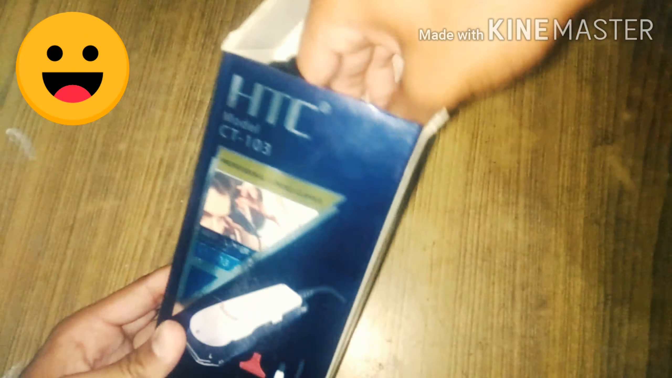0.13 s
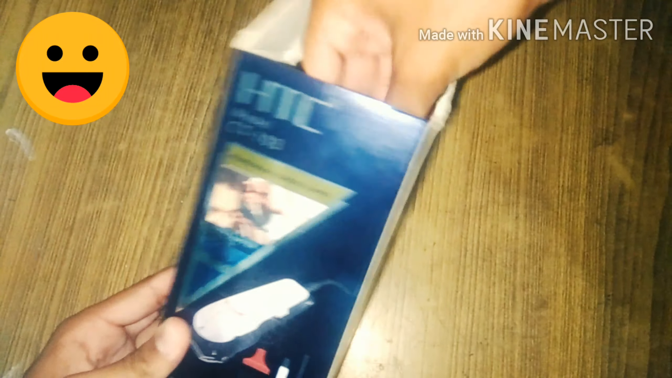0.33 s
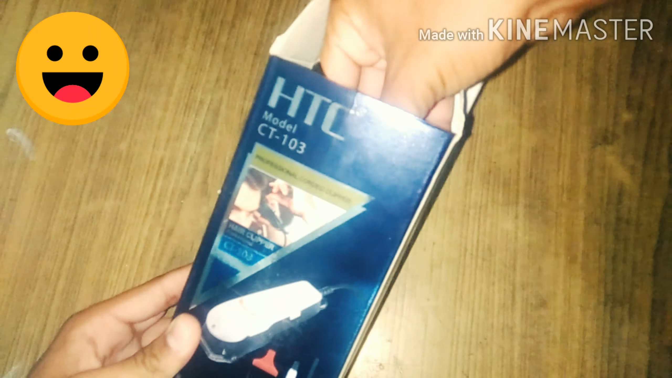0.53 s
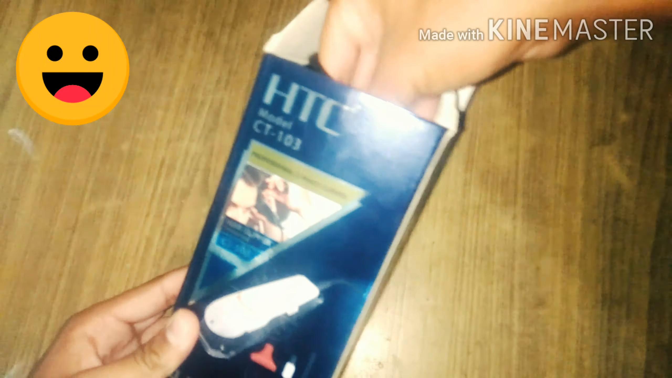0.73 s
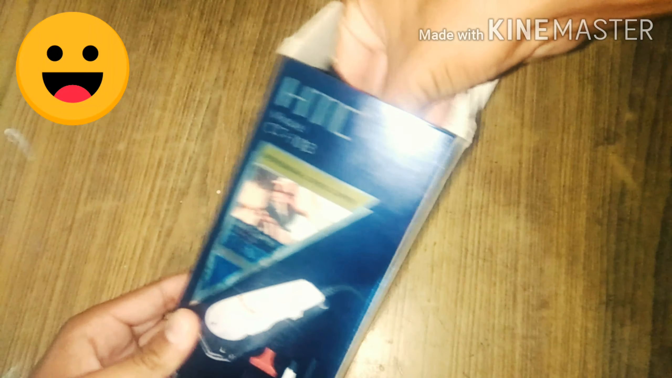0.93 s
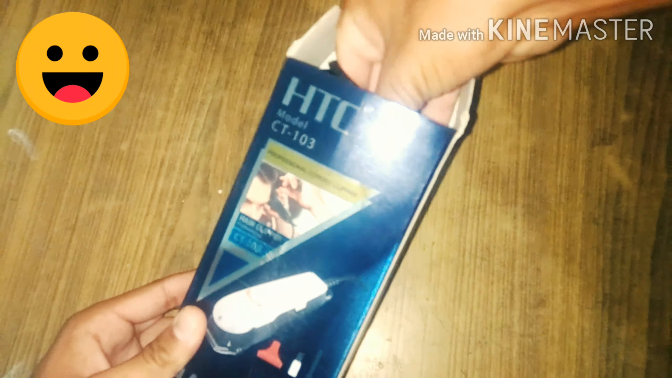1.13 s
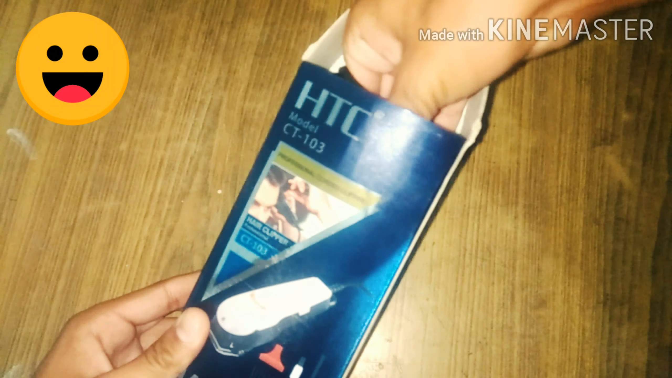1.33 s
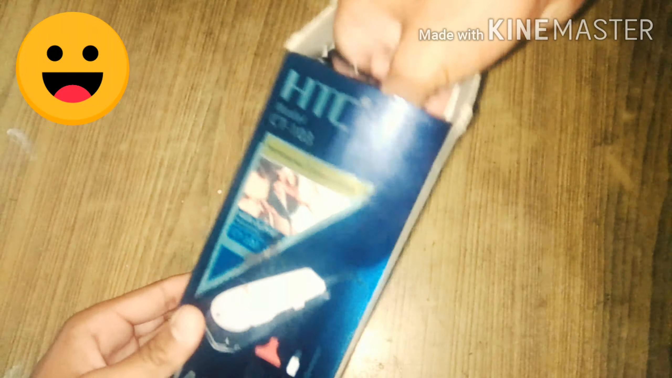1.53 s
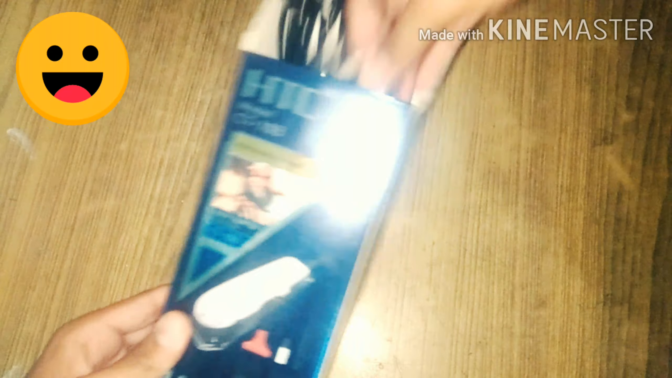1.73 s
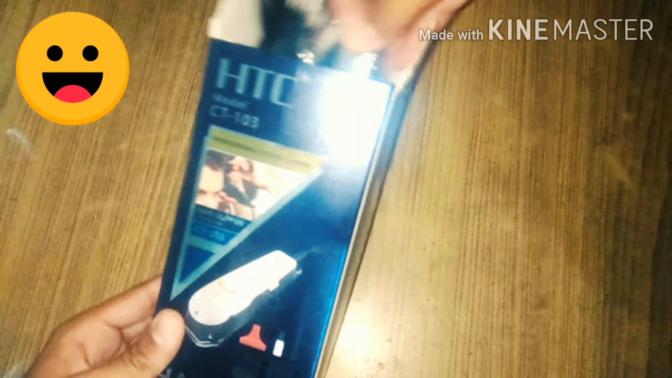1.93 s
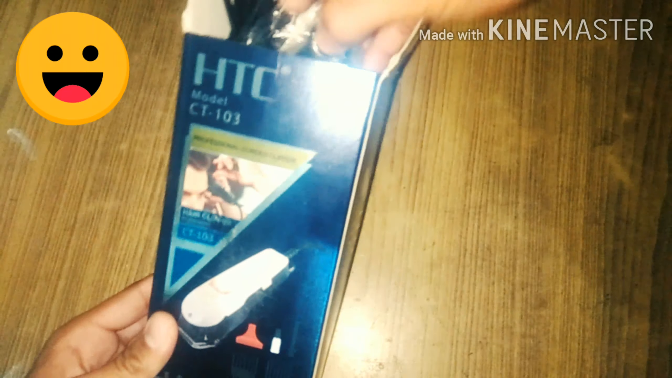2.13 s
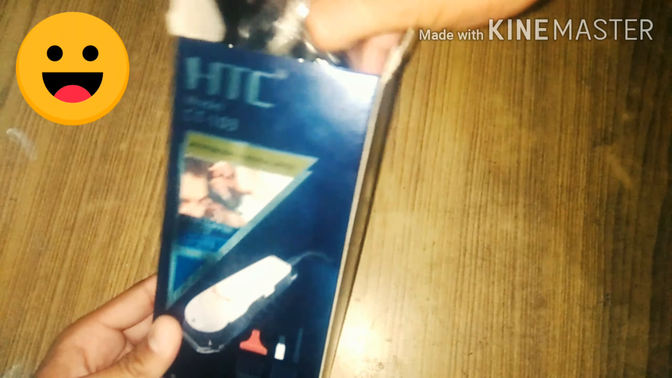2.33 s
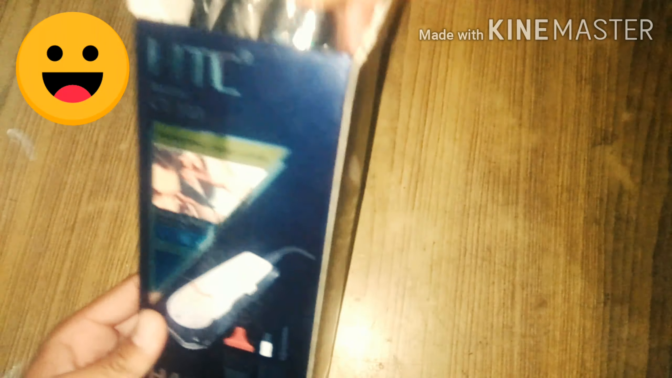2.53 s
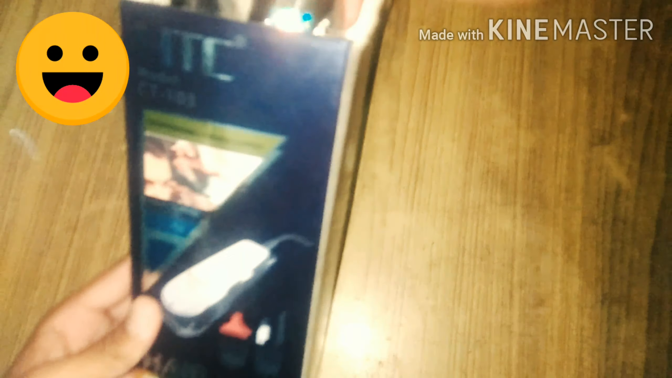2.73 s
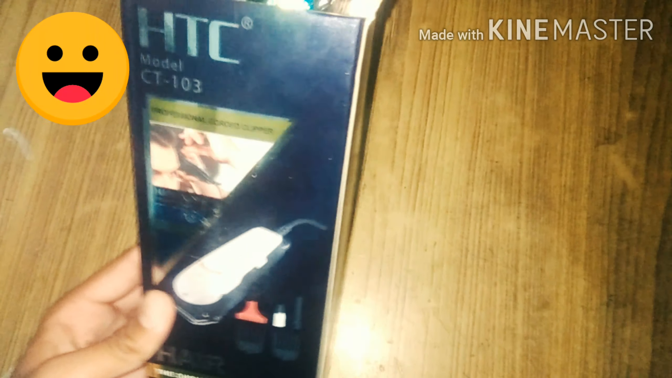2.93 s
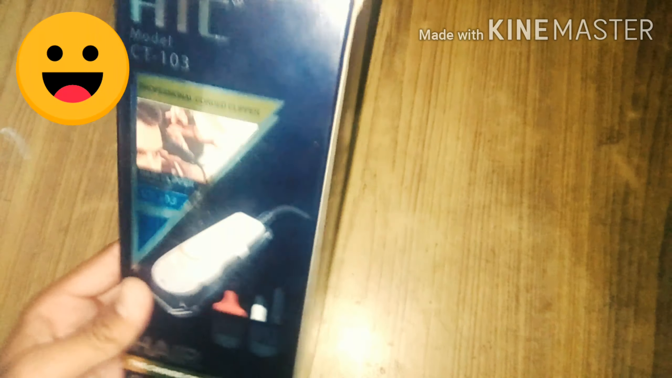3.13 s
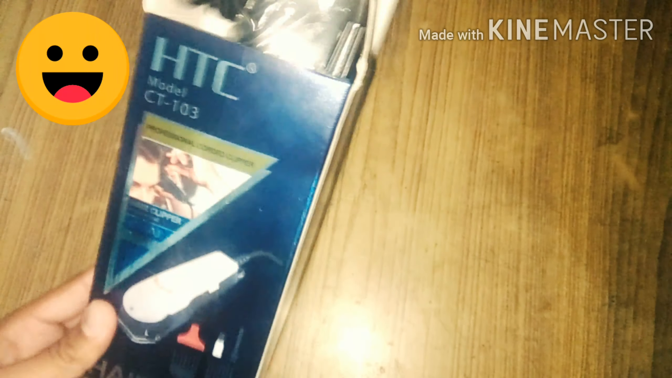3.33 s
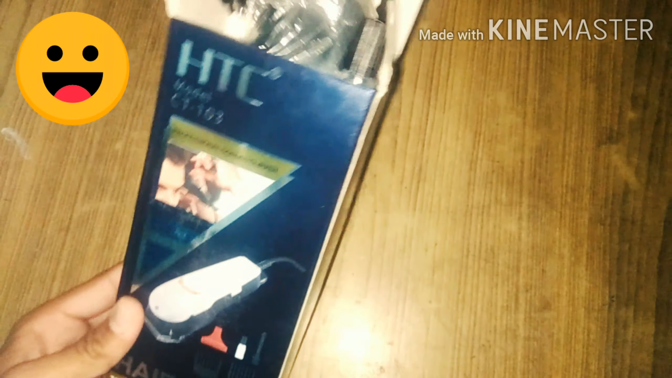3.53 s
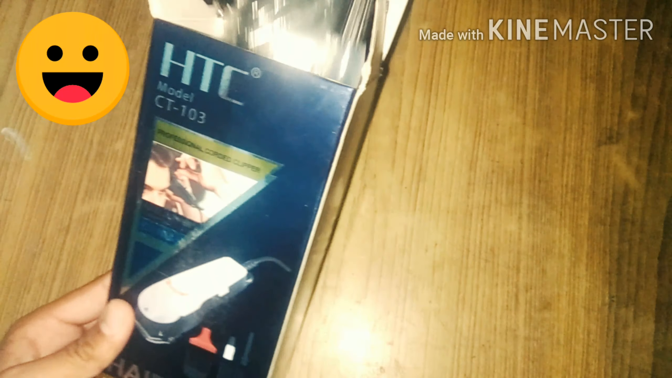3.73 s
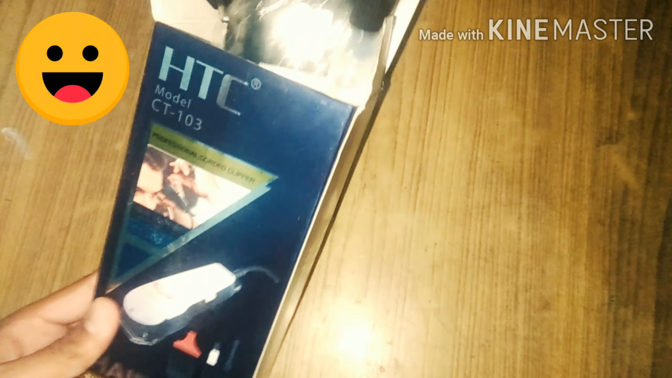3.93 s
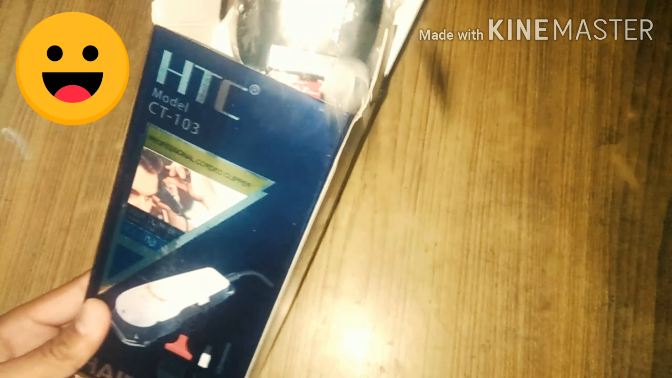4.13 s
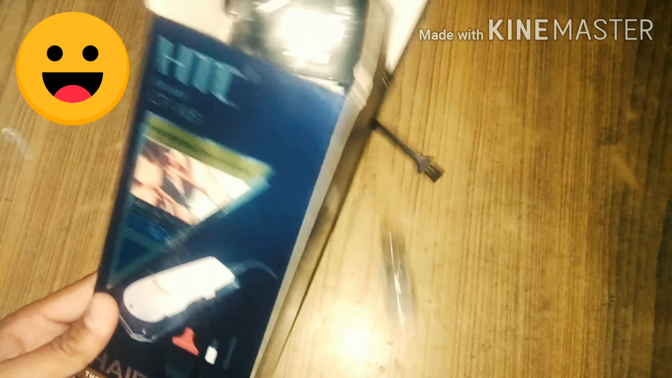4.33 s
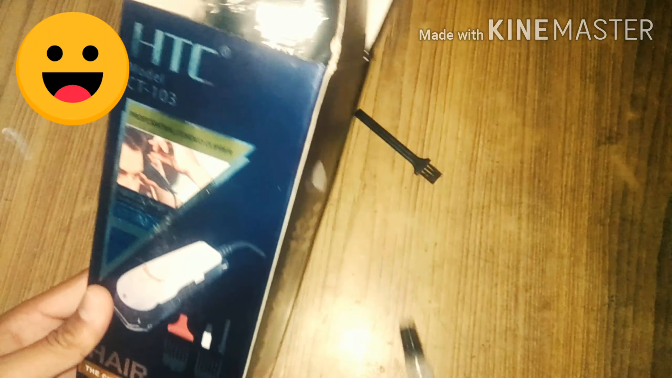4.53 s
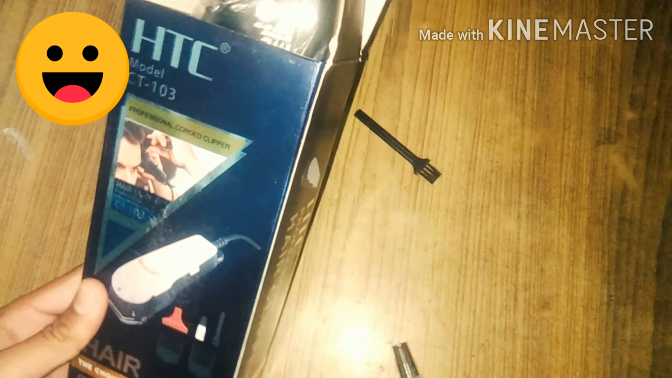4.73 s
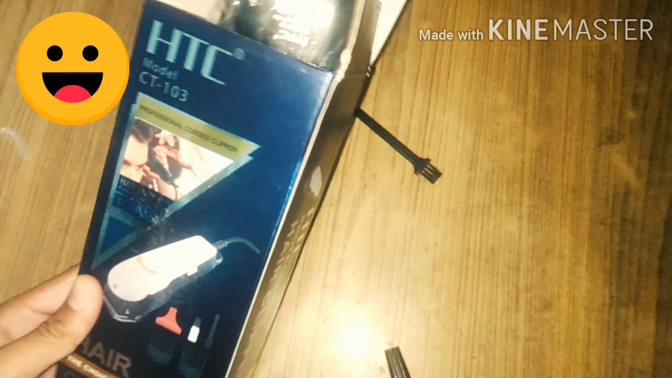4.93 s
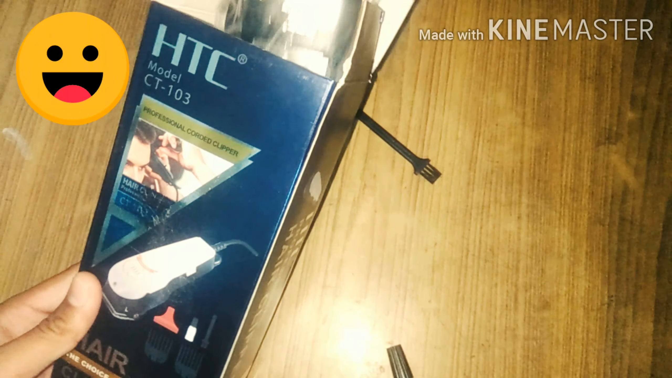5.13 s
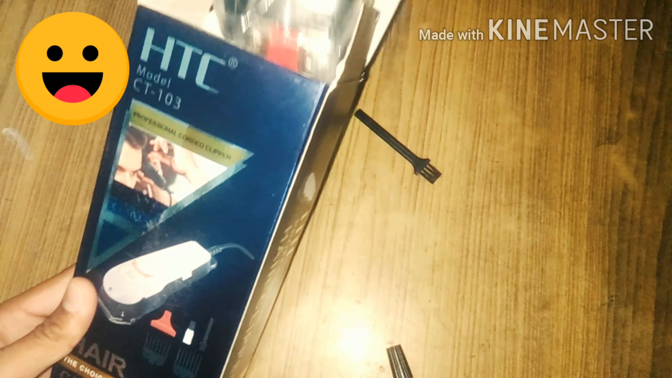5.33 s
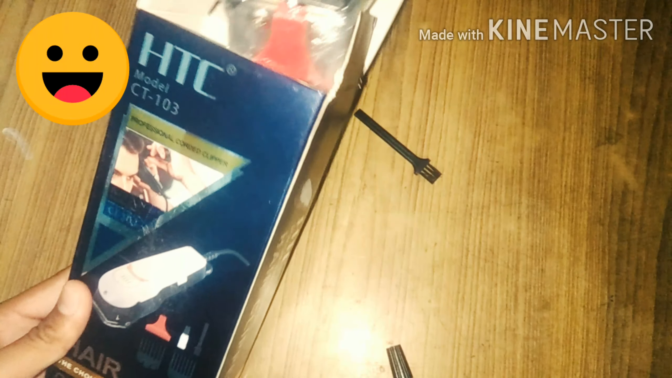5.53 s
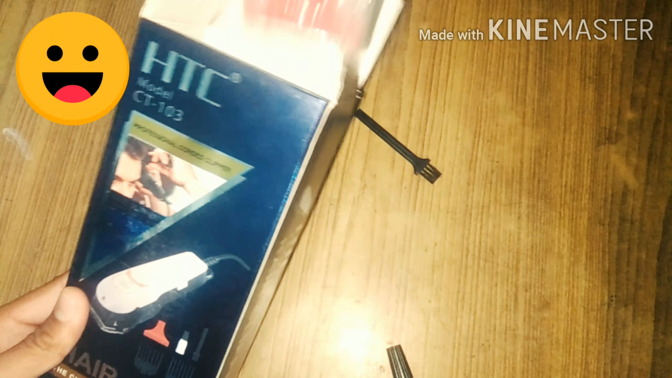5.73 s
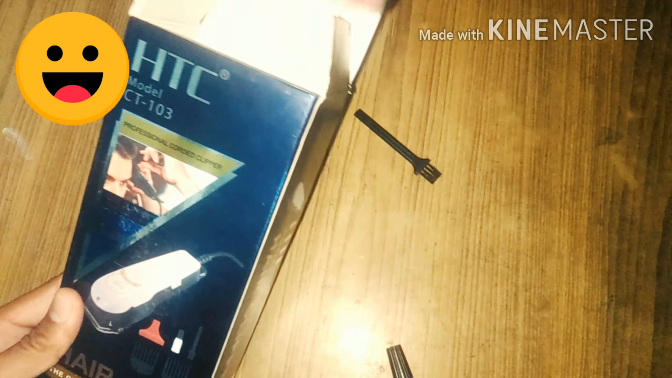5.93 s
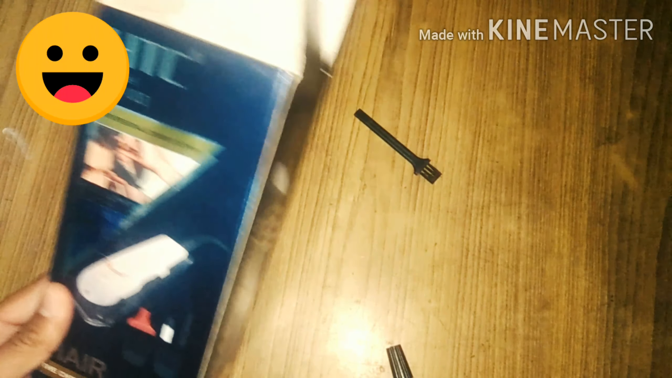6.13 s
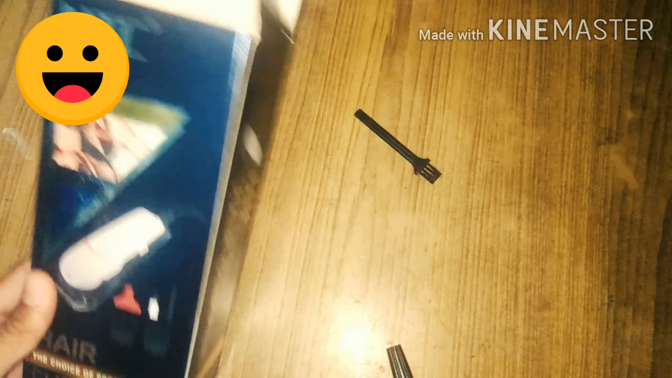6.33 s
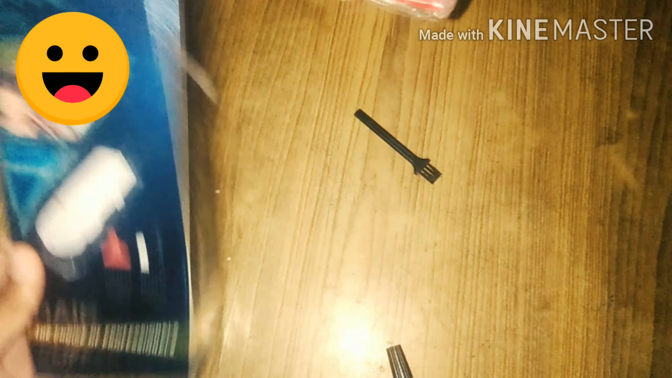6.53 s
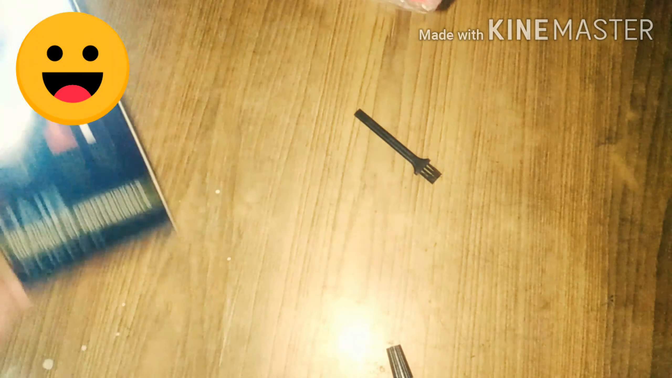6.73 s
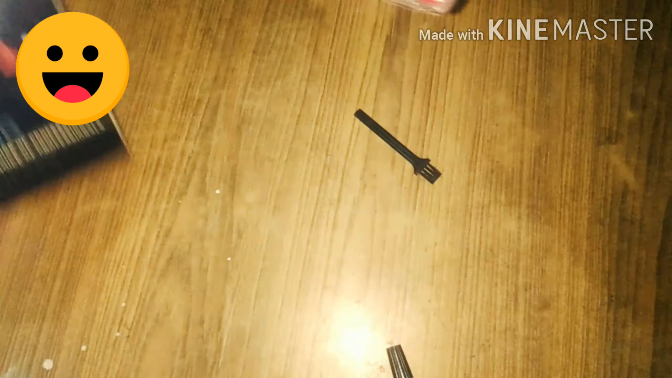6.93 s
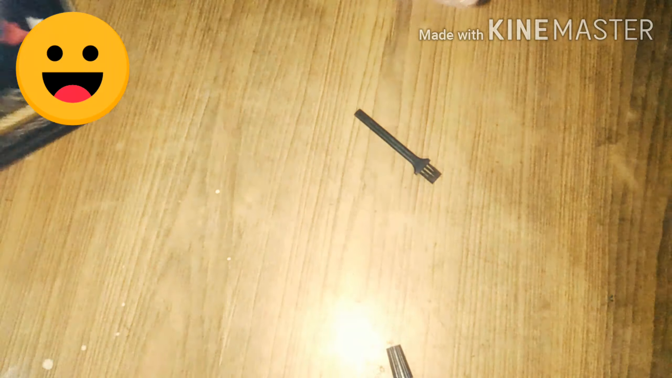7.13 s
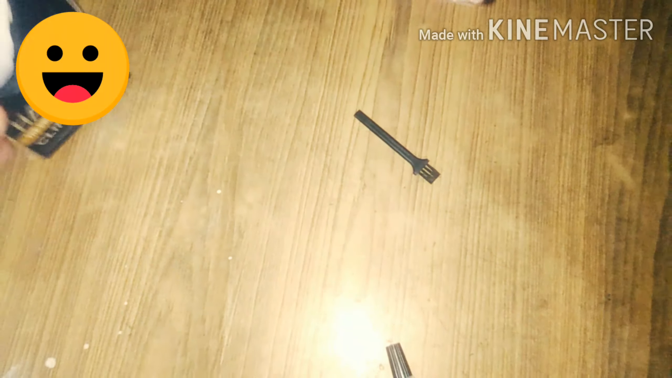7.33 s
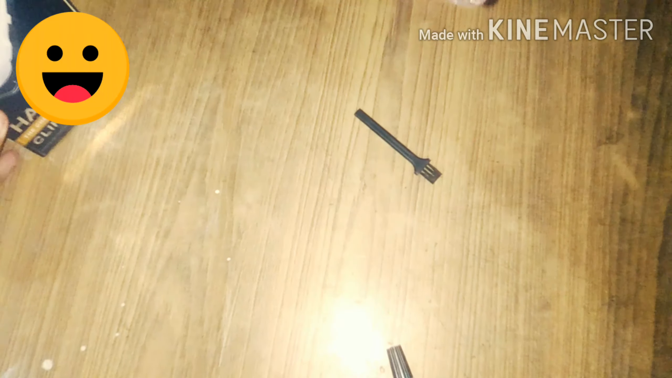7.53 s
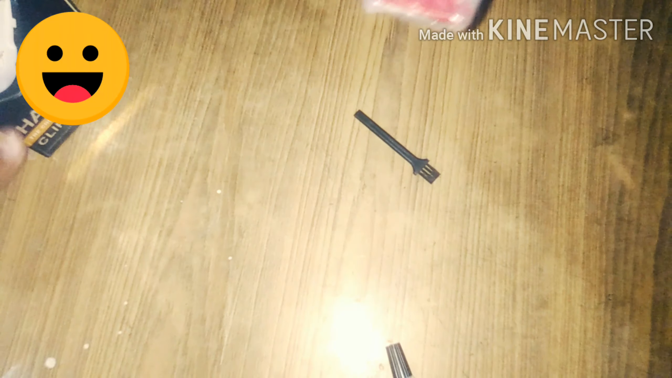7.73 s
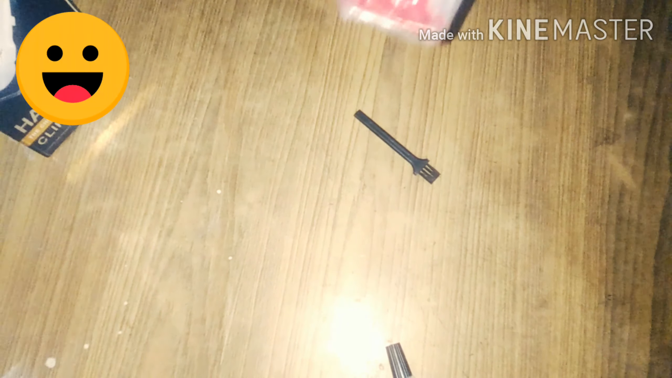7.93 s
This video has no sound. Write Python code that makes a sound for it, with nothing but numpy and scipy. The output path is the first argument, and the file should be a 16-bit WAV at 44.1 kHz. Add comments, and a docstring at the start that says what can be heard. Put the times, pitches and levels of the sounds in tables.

```python
"""Plastic tray out of a cardboard box

Place: a small quiet room, a wooden table; a two-port microphone close to the hands.
Hands pull a thin plastic tray out of a small box, small parts drop out, the empty box is set down.
Blows ring decaying sines of table, board and plastic; strokes shake the same modes with stick-slip noise.
Dragged edges squeak as gliding narrow bands, and creases crackle from all over the tray.
Random echo taps make the room's answer, over a steady hush of shaped noise."""
import sys
import numpy as np
from scipy import signal
from scipy.fft import rfft, irfft, next_fast_len
from scipy.io import wavfile
from scipy.ndimage import uniform_filter1d

SR = 44100
rng = np.random.default_rng(int(sys.argv[2]) if len(sys.argv) > 2 else 0)


def decibels_to_gain(level_db):
    """Convert a level in decibels to a linear amplitude gain (20 dB per decade)."""
    exponent = np.asarray(level_db, float) / 20
    return 10 ** exponent


def inscribe(sig):
    """Save sig as 16-bit PCM at rate SR to the path in sys.argv[1].

    A 1-D sig is mono; a 2-D sig holds one channel per row.
    Samples are clipped to [-1, 1] before scaling.
    """
    pcm = np.round(np.clip(np.atleast_2d(sig).T, -1, 1) * 32767)
    wavfile.write(sys.argv[1], SR, pcm.astype(np.int16))


N = 355871  # length of the scene [samples]


# thuds of box and parts on the table top: (time [s], peak level at the source [dB], centre [Hz],
# for some also a spread of their own [octaves], narrower or broader)
THUDS = [(0.06, -47.5, 172), (0.137, -41.5, 151), (0.496, -44, 198), (0.528, -46.5, 93), (0.974, -53, 287),
         (1.041, -47, 92.5), (1.598, -44.5, 248), (1.74, -45, 410), (1.886, -30, 230), (1.914, -36.5, 153),
         (1.955, -45, 150), (1.994, -49.5, 334), (3.203, -40.5, 304), (3.232, -38, 400), (3.268, -37, 400),
         (3.284, -34, 220), (3.312, -36, 240), (3.349, -39, 193), (3.456, -39.5, 239), (3.58, -46, 191, .4),
         (3.753, -45, 274), (3.997, -45.5, 151), (4.092, -33, 182), (4.234, -30, 160),
         (4.235, -30, 380, .35), (4.287, -35, 260), (4.373, -35, 400), (4.4475, -24, 360, .35),
         (4.4465, -23, 190, .3), (4.48, -29, 195, .2), (4.52, -38, 200), (4.572, -31, 325, .06),
         (4.575, -35, 200, .2), (4.668, -35, 325, .06), (4.667, -41, 200), (4.73, -45, 200),
         (4.765, -46, 330), (5.385, -43.5, 211), (5.582, -37, 208), (5.742, -32, 206), (5.777, -32, 207),
         (6.732, -50, 190), (7.232, -26, 156.5), (7.43, -28, 152), (7.455, -34.5, 151),
         (7.478, -33, 151, .1), (7.671, -48.5, 141), ]
# modes of the table top: (frequency [Hz], relative level [dB], t60 [s])
TABLE_MODES = [(82, -17, 0.12), (96, -4, 0.18), (122.1, -7, 0.18), (151, 0, .15), (171.2, -4.5, 0.059),
               (195, 0.5, 0.17), (222, -2, 0.1), (249.4, 5, 0.084), (280.8, -3, 0.08), (325, -5, 0.17),
               (365, -8, 0.07), (410, -4.5, 0.1)]


def table_thuds():
    """Soft, long contacts ring the slow modes of the table top."""
    return struck(THUDS, TABLE_MODES, contact_s=0.0028, octaves=0.25, grip_db=3.5)


# knocks on the board: (time [s], peak level at the source [dB], centre [Hz],
# for some also a spread of their own [octaves], narrower or broader)
KNOCKS = [(0.064, -41, 1270), (0.124, -39, 1100), (0.1412, -24, 900, .35), (0.495, -36.5, 740),
          (0.496, -33, 1070), (0.635, -34, 1250, .2), (0.981, -37, 600), (1.176, -40, 1110),
          (1.194, -45, 1200, .3), (1.338, -28.5, 1040, .35), (1.392, -44, 810), (1.427, -46, 1200),
          (1.448, -40, 964), (1.606, -28.5, 657), (1.656, -42, 1180), (1.696, -30.5, 1010),
          (1.712, -35.5, 950), (1.738, -33, 1180), (1.744, -28, 1200), (1.795, -41, 1280),
          (1.822, -17.5, 1040), (1.887, -29, 1500, .3), (1.89, -29, 520), (1.899, -31, 1100),
          (1.916, -34, 1200), (1.973, -30, 1270), (1.987, -35, 1250), (2.108, -32.5, 800),
          (2.185, -42, 1130), (2.205, -47.5, 467), (2.306, -44.5, 1140), (2.377, -42, 1300),
          (2.534, -33, 620), (2.943, -41, 520, .2), (2.878, -46.5, 544), (2.912, -38, 1050),
          (3.145, -39, 700), (3.189, -32.5, 1470), (3.21, -31.5, 1370), (3.312, -23, 1000),
          (3.339, -29, 634), (3.454, -37, 1300), (3.513, -32.5, 1240), (3.534, -36, 500),
          (3.761, -35.5, 1460), (3.812, -40.5, 525), (3.835, -37, 1270), (3.904, -33.5, 1220),
          (3.998, -39, 583), (4.089, -21, 826), (4.236, -36, 480, .2), (4.288, -35.5, 540),
          (4.376, -34, 452), (4.386, -37.5, 479), (4.431, -34.5, 1116), (4.447, -11, 620, .5),
          (4.485, -21.5, 930), (4.55, -36, 801), (4.57, -32.5, 589.4), (4.615, -35.5, 474),
          (4.669, -40, 1400, .15), (4.669, -40, 650), (4.71, -40, 600), (4.911, -46, 1500, .15),
          (4.935, -33.5, 900, .4), (5.297, -32, 1090), (5.388, -39.5, 614), (5.474, -47, 1400),
          (5.581, -24.5, 1040), (5.7395, -17, 990, .3), (5.7755, -17, 1000, .25), (6.658, -52, 1790, .1),
          (6.997, -55, 1780, .1), (7.175, -58, 700, .2), (7.232, -34, 729, .2), (7.233, -33, 1350, .2),
          (7.306, -32, 700, .3), (7.422, -41, 720, .3), (7.459, -35.5, 560), (7.675, -44.5, 510)]
# modes of the board: (frequency [Hz], relative level [dB], t60 [s])
BOARD_MODES = [(454, -5, 0.044), (513.2, 1.5, 0.047), (581.8, -1, 0.044), (650, -3, .04), (705, -1, .05),
               (737, -7.5, 0.083), (781, -9, 0.076), (854.4, -2, 0.04), (966, 7, 0.02), (1009, -0.5, 0.05),
               (1110, 6.5, 0.025), (1173, 5.5, .035), (1270, 5.5, 0.042), (1357, 5, 0.037),
               (1469, 9, 0.019), (1570, -4, 0.027), (1687, -5, 0.025), (1780, -6, .025)]


def board_knocks():
    """Shorter contacts ring the faster modes of the cardboard."""
    return struck(KNOCKS, BOARD_MODES, contact_s=0.00075, octaves=0.45, grip_db=5)


# single snaps of the plastic tray: (time [s], peak level at the source [dB], centre [Hz],
# for some also a spread of their own [octaves], narrower or broader)
SNAPS = [(0.0641, -42.5, 2850), (0.1445, -33, 2120), (0.326, -46, 3300), (0.351, -48, 4300),
         (0.3861, -41, 3500), (0.412, -45, 3100), (0.499, -42, 2290), (0.5, -49, 5000), (0.531, -50, 5200),
         (0.5614, -48, 5160), (0.6519, -46.5, 3520), (0.807, -35.5, 3480), (0.831, -39, 3260),
         (0.864, -38.5, 3700), (0.962, -47.5, 5130), (0.965, -39, 3470), (1.177, -52, 3300),
         (1.194, -54, 4500), (1.234, -52, 4500), (1.339, -43, 2420), (1.339, -50, 5300),
         (1.3924, -44, 2460), (1.427, -47, 3000), (1.4488, -38.5, 2300), (1.595, -42.5, 2400),
         (1.657, -40, 2800), (1.664, -46, 5000), (1.833, -40, 3200), (1.855, -41, 3200), (1.863, -40, 3400),
         (1.887, -40, 3000), (1.913, -45, 3110), (1.926, -50, 6000), (1.987, -44, 3200),
         (1.9733, -37.5, 3100), (2.0538, -36.5, 2400), (2.154, -46.5, 3230), (2.1665, -42.5, 3600),
         (2.1847, -38.5, 3800), (2.2083, -38, 2200), (2.2095, -38, 5400), (2.398, -50, 5300),
         (2.813, -47, 3200), (3.106, -51, 4800), (2.267, -47, 2860), (2.308, -43, 2780),
         (2.4675, -44.5, 2360), (2.9133, -36, 3200), (2.57, -48, 2400), (3.1884, -41, 2600),
         (3.2051, -33, 2200), (3.3139, -26, 2160), (3.314, -34, 3300), (3.339, -30, 2250),
         (3.496, -43, 5000), (3.611, -52, 5530), (3.701, -54, 5600), (3.94, -48, 5400), (4.021, -45, 4200),
         (3.868, -49, 5500), (3.6663, -45.5, 2460), (3.7579, -43.5, 3470), (3.996, -39, 3200),
         (4.0438, -41, 3260), (4.0696, -38, 3400), (4.089, -22.5, 1970), (4.158, -46, 5360),
         (4.1978, -49, 5380), (4.2153, -43, 5350), (4.2336, -34.5, 4530), (4.2956, -39.5, 3600),
         (4.348, -46.5, 4134), (4.376, -25, 5780), (4.377, -27, 3200), (4.388, -28, 4500),
         (4.4333, -32, 2320), (4.448, -28, 2600), (4.484, -28, 5800), (4.4855, -26, 3767),
         (4.5492, -39, 3680), (4.6809, -39, 3794), (4.7038, -43.5, 2650), (4.7741, -42, 3040),
         (4.7745, -40, 5200), (4.803, -47, 6000), (4.837, -45, 5600), (4.913, -49.5, 2000),
         (4.9362, -48, 1990), (4.992, -60, 3980), (5.2982, -38, 2070), (5.3597, -50, 3200),
         (5.3857, -42.5, 3450), (5.4182, -44.5, 3540), (5.538, -48.5, 2620), (5.5825, -28.5, 2295),
         (5.7282, -39.5, 3126), (5.7403, -13, 2350, .25), (5.7412, -24, 3300, .2), (5.757, -33, 3000),
         (5.7755, -15, 2350, .25), (5.7765, -23, 3300, .2), (5.797, -29.5, 2500), (5.9284, -53.5, 3100),
         (6.662, -63, 4540), (6.999, -61.5, 3000), (7.069, -60.5, 5600), (7.234, -38, 2060),
         (7.233, -43, 5000), (7.3068, -41, 3100), (7.4, -54, 4000), (7.421, -47, 3580), (7.439, -48, 4500),
         (7.461, -46, 2600), (7.5157, -49, 2800), (7.549, -52, 2570), (7.575, -56, 2400),
         (7.676, -47, 1900), (7.677, -47, 3200), (7.675, -50, 5600)]
# modes of the plastic: (frequency [Hz], relative level [dB], t60 [s])
PLASTIC_MODES = [(2000, -5, 0.012), (2160, 1.5, 0.0064), (2300, -6.5, 0.014), (2443, -7, 0.015),
                 (2640, -11, 0.019), (2885, -1.5, 0.0092), (3246, 0.5, 0.0078), (3650, -8.5, 0.012),
                 (4230, -6.5, 0.01), (4430, -8, 0.0048), (4830, -6, 0.008), (5380, -5, 0.007),
                 (5900, -6, 0.009), (6350, -3.5, 0.0041), (8630, -1.5, 0.0022), (8840, -8, 0.0051)]


def tray_snaps():
    """Dents that flip in the thin tray ring its high, short modes."""
    return struck(SNAPS, PLASTIC_MODES, contact_s=0.00029, octaves=0.42, grip_db=2)


def struck(events, modes, contact_s, octaves, grip_db):
    """The ring swells in over the contact; hands and table damp it after its first peak by up to grip_db."""
    out = np.zeros(N)
    t = np.arange(0, np.max(modes, 0)[2], 1 / SR)
    swell = 1 - np.exp(-(t / contact_s) ** 2)
    damping = decibels_to_gain(-grip_db * (1 - np.exp(-t / (3.2 * contact_s))))
    ring = rings(modes, len(t)) * swell * damping
    lucks = rng.standard_normal((len(events), len(modes)))
    for (start, db, centre_hz, *own), luck in zip(events, lucks):
        spread_octaves = own[0] if own else octaves
        add(out, start + .0008, decibels_to_gain(db) * blow(modes, ring, centre_hz, spread_octaves, luck))
    return out


def blow(modes, ring, centre_hz, octaves, luck):
    """The place of a blow favours the modes near centre_hz; most start in step, which makes the click; peak 1."""
    hz = np.transpose(modes)[0]
    distance = np.log2(hz / centre_hz) / octaves
    weight = np.exp(-.5 * distance ** 2) + .06
    sound = (weight * (1 + .25 * luck)) @ ring
    return sound / abs(sound).max()


def rings(modes, length):
    """Each mode is one sine that dies away by 60 dB in its t60."""
    hz, db, t60 = np.transpose(modes)[:, :, None]
    t = np.arange(length) / SR
    return decibels_to_gain(db - 60 * t / t60) * np.sin(2 * np.pi * hz * t)


def rubbing():
    """Tray and hands slide on the board; the free panel adds a resonance that shifts with the tray."""
    panel_hz = np.transpose(STROKES)[3]
    scrape = stroking(0)
    # pitch of the panel at every sample, weighted by the strokes that sound
    moving_hz = scrape / stroking(-20 * np.log10(panel_hz))

    # a box pressed on the table has a lower panel and rumbles more: 7 dB per octave below 700 Hz
    rumble = stroking(-4 - 7 * np.log2(panel_hz / 700))
    # a light slide hardly moves the slowest table modes: 24 dB per octave less below 150 Hz
    light = [(hz, db - 24 * max(np.log2(150 / hz), 0), t60) for hz, db, t60 in TABLE_MODES]

    # board modes above stiff_hz grow as the free panel gets smaller and higher
    stiff_hz, stiff_db_per_octave = 900, 6.5
    low = excite([m for m in BOARD_MODES if m[0] <= stiff_hz], 500, 5.4, 1.0, count=3)
    high = excite([m for m in BOARD_MODES if m[0] > stiff_hz], 500, 5.4, 1.0, count=3)
    stiffness = decibels_to_gain(stiff_db_per_octave * np.log2(moving_hz / stiff_hz))
    panel = resonate(slips(900, 4.0, .6), moving_hz, 280)
    board = low + stiffness * high + 0.44 * panel
    return scrape * evened(board) + rumble * excite(light, 200, 4.7, 0.25, count=3)


# strokes of hands and tray along the board: (start [s], length [s], scrape level at the source [dB],
# free panel resonance [Hz], tray crinkle relative to the scrape [dB])
STROKES = [(.0, 2, -72, 900, -1), (0.093, 0.16, -62, 940.4, -21), (0.321, 0.094, -61, 1020, -3.5),
           (0.497, .17, -66.5, 1104, -3), (0.754, 0.077, -62, 1037, -1.5), (0.958, 0.078, -59, 700, -12),
           (1.138, 0.36, -70, 996, -5), (1.566, 0.071, -58.5, 740, -5), (1.659, 0.07, -49, 1028, -4),
           (1.745, 0.1, -42, 1163, -7), (1.897, 0.04, -50.5, 1006, -9.5), (2.003, 0.093, -68, 1013, 9),
           (2.137, 0.35, -66.5, 1044, -3), (2.506, 0.15, -59.5, 540, -8), (2.62, 0.09, -63, 758, -5),
           (2.8, .05, -65, 600, -4), (2.898, 0.066, -60, 584.6, 0), (3.006, 0.19, -71, 650, -1),
           (3.205, 0.14, -46, 800, -1.5), (3.426, 0.086, -50, 800, -7.5), (3.568, 0.2, -64, 900, -7.5),
           (3.744, 0.16, -52.5, 1150, -6.5), (3.936, 0.076, -52.5, 750, -7),
           (4.056, 0.053, -52.5, 739, -16), (4.209, 0.12, -55.5, 502, -13), (4.398, .115, -45, 700, -2),
           (4.52, 0.062, -45.5, 537, -18), (4.6, 0.18, -56.5, 560, -21), (4.922, 0.081, -72.5, 720, -2.5),
           (5.04, 0.37, -77, 700, -6), (5.236, 0.32, -66, 900, -5), (5.576, 0.24, -64.5, 952, -5.5),
           (5.752, 0.19, -68.5, 935, -8), (6.022, 0.52, -94.5, 557, -18), (6.566, .15, -86, 560, -11.5),
           (6.73, 0.1, -74.5, 650, -13), (6.88, .1, -77.5, 560, -18.5), (7.001, .2, -73.5, 640, -14),
           (7.238, .14, -60, 700, -11), (7.417, 0.037, -50.5, 652, -9), (7.5, 0.2, -62, 600, -17),
           (7.751, 0.28, -74.5, 950, -7.5)]


def stroking(extra_db):
    """Strokes set in fast and die away more slowly; each is shifted by its own extra_db."""
    start, length, db = np.transpose(STROKES)[:3]
    return summed(envelopes(start, length, db + extra_db, rise_db_per_s=701.5, fall_db_per_s=255.5))


def envelopes(start, length, db, rise_db_per_s, fall_db_per_s):
    """Gain of each event every 64 samples: rise before the start, hold, fall, all straight in dB."""
    t = np.arange(0, N + 64, 64) / SR - start[:, None]
    rise = rise_db_per_s * np.minimum(t, 0)
    fall = fall_db_per_s * np.maximum(t - length[:, None], 0)
    return decibels_to_gain(db[:, None] + rise - fall)


def summed(gains):
    """Adds events by power and reads the sum at every sample."""
    return np.interp(np.arange(N) / 64, np.arange(gains.shape[1]), np.linalg.norm(gains, axis=0))


def slips(per_s, spread_db, smooth):
    """Stick-slip force: clicks of uneven size over a share of smooth friction noise."""
    at, big, sign = rng.random((int(per_s * N / SR), 3)).T
    size = decibels_to_gain(spread_db * np.minimum(-np.log(big), 3.5))
    clicks = np.zeros(N)
    clicks[(at * N).astype(int)] = size * np.sign(sign - .5)
    return evened(clicks) + smooth * rng.standard_normal(N)


def excite(modes, per_s, spread_db, smooth, count):
    """Several contact points, each shaking the modes with its own signs."""
    signs = rng.choice([-1., 1.], (count, len(modes)))
    total = np.zeros(N)
    for response in signs @ rings(modes, SR // 5):
        total += signal.oaconvolve(slips(per_s / count, spread_db, smooth), response)[:N]
    return evened(total)


def resonate(x, hz, width_hz):
    """A moving resonance: shifts the curve hz down to zero, smooths twice, and shifts back."""
    turn = np.exp(2j * np.pi * np.cumsum(hz) / SR)
    r = np.exp(-np.pi * width_hz / SR)
    smoothed = signal.lfilter([1], [1, -2 * r, r * r], x / turn)
    return evened((turn * smoothed).real)


# bright crinkles, when fingers crush small creases of the tray: (start [s], length [s], level [dB])
CRINKLES = [(0.36, 0.05, -64), (0.78, 0.05, -60), (0.947, 0.018, -57.5), (2.128, 0.16, -68),
            (3.415, 0.09, -64), (3.99, 0.06, -65), (4.21, 0.09, -60.5), (4.379, 0.02, -46),
            (4.67, 0.22, -72.5), (5.345, 0.11, -73), (5.704, .03, -66), (7.42, .02, -67), (1.72, .14, -63),
            (3.2, .08, -62)]


def rustle():
    """Wide creases shake mostly the low modes of the tray, small ones the high; both come in clumps."""
    _, _, db, _, tray_db = np.transpose(STROKES)
    # small creases grow by only a share of the crinkle above a quiet level
    fine_share, quiet_db = 0.63, -76
    fine_db = -6 - (1 - fine_share) * (db + tray_db - quiet_db)
    # high snaps leave a brighter crackle: 35 dB per octave about 3900 Hz, up to 4 dB
    snap_hz = np.array([row[2] for row in SNAPS])
    bright_db = np.minimum(35 * np.log2(snap_hz / 3900), 4)

    coarse = np.hypot(stroking(tray_db), shiver(0))
    fine = np.hypot(stroking(tray_db + fine_db), shiver(bright_db))
    crushed = envelopes(*np.transpose(CRINKLES), rise_db_per_s=2498, fall_db_per_s=255.5)
    fine = np.hypot(fine, summed(crushed))

    clumps = evened(uniform_filter1d(rng.standard_normal(N), size=500))
    wide = [(hz, level - 14 * max(np.log2(hz / 3300), 0), t60) for hz, level, t60 in PLASTIC_MODES]
    small = [(hz, level - 20 * max(np.log2(4200 / hz), 0), t60) for hz, level, t60 in PLASTIC_MODES]
    return decibels_to_gain(2.2 * clumps) * (coarse * spread(wide, 1000, 5) + fine * spread(small, 1500, 7.5))


def shiver(extra_db):
    """A snap leaves the tray crackling, from 27.5 dB under its listed level plus extra_db, dying away."""
    start, db = np.transpose([row[:2] for row in SNAPS])
    return summed(envelopes(start, 0 * start, db - 27.5 + extra_db, rise_db_per_s=5000, fall_db_per_s=309.5))


def spread(modes, per_s, spread_db):
    """Crackle from all over the tray: one part reaches both ports, and each port hears spots of its own."""
    shared, *own = (excite(modes, per_s, spread_db, 0.3, count=3) for spot in range(3))
    return evened(shared + 1.3 * np.array(own))


# narrow drags of an edge:
# (start [s], length [s], top level at the source [dB], first pitch [Hz], last pitch [Hz])
SQUEAKS = [(0.074, 0.099, -62.5, 1430, 1630), (2.125, 0.39, -60.5, 1450, 1540), (2.2, .2, -68, 2280, 2200),
           (1.66, .21, -45, 1000, 1300), (4.455, .07, -46, 970, 950), (4.5, .11, -49, 700, 800),
           (4.7, .09, -59, 720, 680), (1.828, .042, -50, 3200, 3400), (1.978, .06, -48, 1250, 1250),
           (3.2, .06, -46, 1350, 1250), (3.2, .08, -50, 2200, 2450), (3.32, .05, -48, 1350, 1400),
           (3.44, .05, -53, 1300, 1300), (3.51, .045, -54, 1100, 1400), (6.99, 0.17, -68, 1760, 1620),
           (7.4, 0.33, -62.5, 710, 680), (7.793, 0.3, -69, 1460, 1370), (7.9, 0.22, -71, 980, 820)]


def squeaks():
    """An edge dragged over a smooth face slips unevenly in one narrow band that swells, glides and fades."""
    out = np.zeros(N)
    for start, length, db, first_hz, last_hz in SQUEAKS:
        u = np.linspace(0, 1, int(length * SR))
        noise, waver, grip = rng.standard_normal((3, SR // 2))[:, :len(u)]
        waver = 1 + 0.028 * evened(uniform_filter1d(waver, size=1500))  # share of the pitch
        grip = decibels_to_gain(3.0 * evened(uniform_filter1d(grip, size=200)))
        # band width as a share of the first pitch; harder drags are wider
        width = max(.1 + .003 * (db + 70), .03)
        pitch_hz = (first_hz + (last_hz - first_hz) * u) * waver
        drag = resonate(noise * grip, pitch_hz, width * first_hz)
        arch_db = -9 * (2 * u ** 0.92 - 1) ** 2
        add(out, start, decibels_to_gain(db + arch_db) * drag * signal.windows.tukey(len(u), .2))
    return out


def add(mix, start_s, sound):
    """Mixes a sound in from start_s, cut at the end of the mix."""
    part = mix[round(start_s * SR):][:len(sound)]
    part += sound[:len(part)]


def evened(x):
    """Scales to rms 1."""
    return x / np.sqrt(np.mean(x ** 2) + 1e-20)


def read(points, hz):
    """Value of a table at hz, on a log-frequency axis."""
    f, value = np.transpose(points)
    return np.interp(np.log(hz + 1), np.log(f + 1), value)


# phase by which the left port leads: (frequency [Hz], lead [rad])
LEAD = [(150, 0), (430, 0.3), (950, -0.3), (1290, 0.5), (1720, 1.9), (2330, 5.7), (2840, 5.4), (3190, 6.3),
        (3620, 6.2), (3880, 6.6), (4310, 3.8), (5000, 5.2), (5860, 2.6), (6890, 7.9)]
# balance of the ports: (frequency [Hz], left minus right [dB])
TILT = [(60, 1), (150, -1), (300, -1.3), (600, 1), (1010, -4), (2600, 1), (6680, 11)]
# lead the left port gains once the box lies to the left: (frequency [Hz], added lead [rad])
ASIDE_LEAD = [(0, 0), (150, .35), (400, .6), (800, .9), (1250, 1.0), (1700, 0)]
# balance the left port gains once the box lies to the left: (frequency [Hz], added left minus right [dB])
ASIDE_TILT = [(200, 1.5), (900, 4), (1500, 1), (4000, -1), (6700, -3)]
# response of the microphone to box and room, alike at both ports: (frequency [Hz], gain [dB])
MIC = [(20, -34.5), (45, -18), (80, 0), (130, 1), (6800, 1), (7300, -3), (7900, -25.5), (9000, -12),
       (10200, -18), (16000, -38.5)]


def ports(x):
    """The two ports differ in phase and balance; both change once the box lies to the left, from 6.3 s."""
    size = next_fast_len(N + 4096)
    hz = np.fft.rfftfreq(size, 1 / SR)
    side = np.array([[.5], [-.5]])  # left, right
    aside = np.clip((np.arange(N) / SR - 6.3) * 10, 0, 1)  # crossfade of 0.1 s
    pair = decibels_to_gain(side * read(TILT, hz)) * np.exp(1j * (side - .5) * read(LEAD, hz))
    moved = pair * decibels_to_gain(side * read(ASIDE_TILT, hz)) * np.exp(1j * (side - .5) * read(ASIDE_LEAD, hz))
    both = rfft(x * (1 - aside), size) * pair + rfft(x * aside, size) * moved
    return irfft(both * decibels_to_gain(read(MIC, hz)), size)[..., :N]


# decay of the small room: (frequency [Hz], t60 [s])
ROOM = [(100, 0.18), (300, 0.3), (1000, 0.24), (3000, 0.09), (7000, 0.076)]


def room(x):
    """Sparse taps of random sign, each band dying at its own speed, other taps for each port."""
    taps = np.zeros((2, SR // 2))
    slots = np.arange(300, SR // 2 - 20, 20)  # one tap in every 20 samples
    at = slots + rng.integers(0, 20, (2, len(slots)))
    np.put_along_axis(taps, at, rng.choice([-1., 1.], at.shape), 1)
    hz, t, z = signal.stft(taps, SR, nperseg=256)
    z[1] = np.where(hz[:, None] < 400, z[0], z[1])  # long waves reach both ports alike
    decay = decibels_to_gain(-60 * t / read(ROOM, hz)[:, None])
    tail = signal.istft(z * decay, SR, nperseg=256)[1]
    return signal.fftconvolve(x, tail / np.linalg.norm(tail[0]), axes=1)[:, :N]


# spectrum of room hush and preamp hiss: (frequency [Hz], relative density [dB])
HUSH = [(15, -46.5), (25, -19.5), (108, 0), (231, -4), (266, -8.5), (398, -9), (654, -22.5), (911, -18.5),
        (1610, -25), (5120, -31.5), (5760, -27.5), (6640, -33.5), (9270, -40), (11000, -51), (15700, -57.5)]
# likeness of the hush at the two ports: (frequency [Hz], likeness [0-1])
SAME = [(60, 0.9), (190, 0.83), (630, 0.5), (2060, 0), (6680, 0.01)]


def hush():
    """Steady noise of room and preamp with slow patches, more alike at the two ports in the bass."""
    frames, hz = N // 256 + 5, np.fft.rfftfreq(1024, 1 / SR)
    a, b, c, d, patches = rng.standard_normal((frames, 513, 5)).T
    patches = uniform_filter1d(patches, size=12, axis=0)  # over frequency
    patches = evened(uniform_filter1d(patches, size=14, axis=1))  # over time
    same = np.clip(read(SAME, hz), -1, 1)[:, None]
    left = a + 1j * b
    right = same * left + np.sqrt(1 - same ** 2) * (c + 1j * d)
    z = np.array([left, right]) * decibels_to_gain(read(HUSH, hz)[:, None] + 1.5 * patches)
    noise = signal.istft(z, nperseg=1024, noverlap=768)[1][:, :N]
    return decibels_to_gain(-71) * evened(noise)  # rms level in dB


def scene():
    """Box, tray and table close to the ports, the room's answer behind them, over the hush."""
    blows = table_thuds() - board_knocks() + tray_snaps()
    near = blows + rubbing() + squeaks() + rustle()
    return ports(near + decibels_to_gain(-13.5) * room(near)) + hush()


def top_cut(x):
    """Nothing passes above the cut-off."""
    return signal.sosfilt(signal.butter(12, 15500, fs=SR, output="sos"), x)


def record(dry):
    """Takes in the finished mix of the two ports and returns the final, processed sound."""
    return top_cut(dry)


dry = scene()
out = record(dry)
inscribe(out)
```